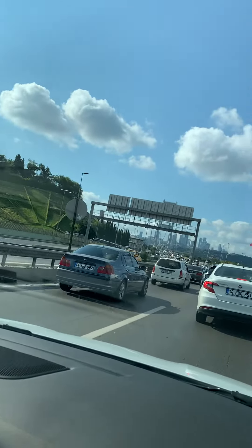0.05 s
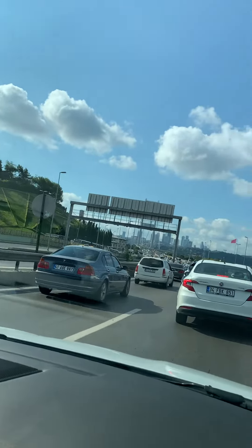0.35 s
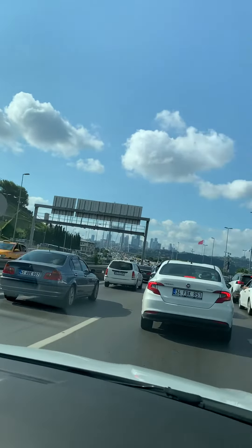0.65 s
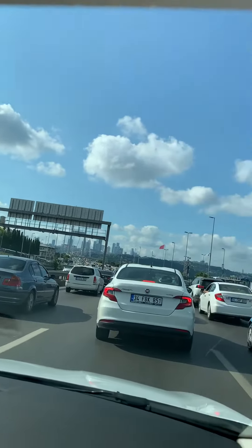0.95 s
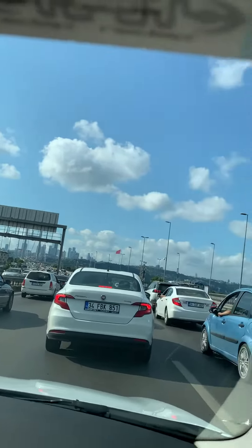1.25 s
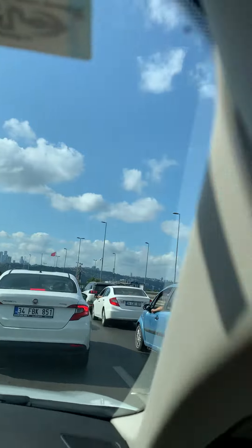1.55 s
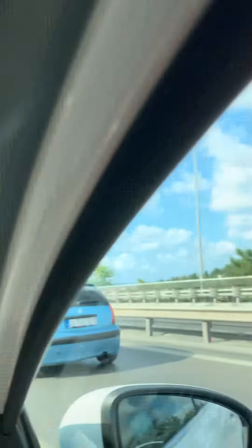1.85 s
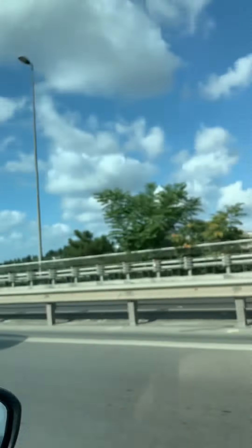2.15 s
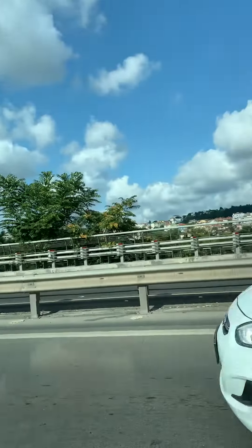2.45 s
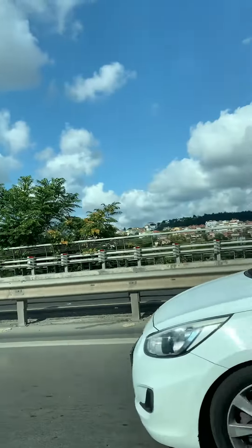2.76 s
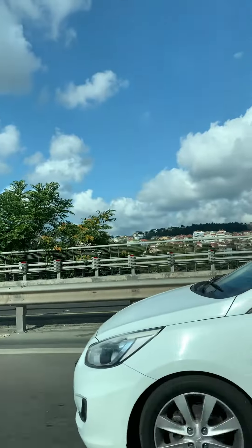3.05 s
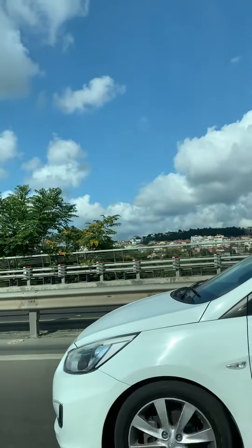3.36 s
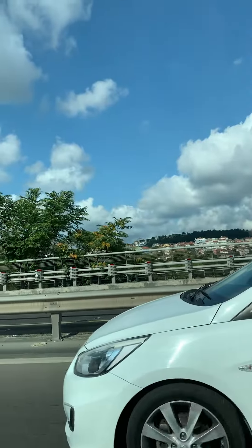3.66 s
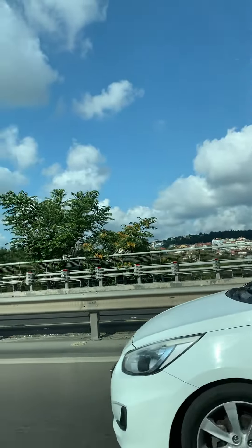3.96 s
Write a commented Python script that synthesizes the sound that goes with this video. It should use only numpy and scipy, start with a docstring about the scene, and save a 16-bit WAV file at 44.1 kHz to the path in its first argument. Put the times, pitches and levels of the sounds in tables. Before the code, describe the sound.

Car engine and road rumble heard from inside, easing to idle in highway traffic.

```python
"""Inside a car rolling in dense highway traffic. At first the engine booms and whines over road rumble,
tyre roar and faint hiss, and soft bumps ring the cabin. The engine sinks to idle and the cabin drones.
Half way, a hand rustles as it turns the phone from the windscreen to the side window, and the trim ticks.
Now the tyres of the next lane come through the glass, swelling and humming, with one more soft bump."""
import sys
import numpy as np
from scipy import signal
from scipy.fft import rfft, irfft
from scipy.io import wavfile
from scipy.ndimage import uniform_filter1d

SR = 44100
rng = np.random.default_rng(int(sys.argv[2]) if len(sys.argv) > 2 else 0)


def generate_wav(sig):
    """Save sig (samples, or channels by samples) to the path in sys.argv[1] as 16-bit PCM at SR."""
    pcm = np.round(np.clip(np.atleast_2d(sig).T, -1, 1) * 32767).astype(np.int16)
    wavfile.write(sys.argv[1], SR, pcm)


N = 176400

# How much louder left is than right, facing ahead and facing the side: pitch_hz, difference_db
AHEAD_BALANCE = [(55, -2), (90, -1.5), (140, -4.5), (210, -6.5), (740, -4.5), (1130, -3), (2600, -0.5)]
SIDE_BALANCE = [(60, 3.5), (140, -4), (330, -10), (740, -6), (1130, -4), (1700, 0)]


def undb(db):
    """Turn decibels into a number to multiply by."""
    return 10 ** (np.asarray(db) / 20)


def clock():
    """The time of every sample, in seconds."""
    return np.arange(N) / SR


def pitches():
    """The pitch of every point in the spectrum, in Hz."""
    return np.maximum(np.arange(N // 2 + 1) * SR / N, 1)


def over_time(rows, column=1):
    """Join the points of a table with straight lines in time."""
    rows = np.array(rows)
    return np.interp(clock(), rows[:, 0], rows[:, column])


def over_pitch(rows):
    """Join the points of a table across pitch, giving each octave equal room."""
    rows = np.array(rows)
    return np.interp(np.log(pitches()), np.log(rows[:, 0]), rows[:, 1])


def peak(pitch_hz, width_hz):
    """The shape of a resonance: 1 at its pitch, less on either side."""
    return 1 / (1 + (2 * (pitches() - pitch_hz) / width_hz) ** 2)


def hump(middle_s, half_width_s):
    """A smooth rise and fall around one moment."""
    return np.exp(-((clock() - middle_s) / half_width_s) ** 2)


def wobble(rate_hz):
    """A smooth random wander, about 1 in size."""
    hold = int(SR / rate_hz)
    steps = rng.standard_normal(256)[np.arange(N) // hold % 256]
    smooth = uniform_filter1d(uniform_filter1d(steps, hold), hold)
    return smooth / np.std(smooth)


def reflections():
    """Echoes in the cabin leave fine peaks and dips in the treble, given in dB."""
    depth_db, spacing_hz, full_above_hz = 1.8, 40, 1500
    ripple = np.interp(pitches(), np.arange(512) * spacing_hz, rng.standard_normal(512))
    return depth_db * np.minimum(pitches() / full_above_hz, 1) * ripple


def noise(tone_db, balance_db=0):
    """Shaped noise of strength 1 at two microphones: partly shared, the right one a little late."""
    # How alike the two sides are (1 is the same): pitch_hz, likeness
    likeness = [(50, .998), (120, 0.93), (220, 1), (380, 0.52), (600, 0.37), (1000, 0.56), (2000, 0.8),
                (4000, 0.51), (7000, 1)]
    # How far the right side lags the left: pitch_hz, lag_radians
    lag = [(60, 0), (430, -.7), (700, .3), (1350, 0), (1800, .6), (2500, 2.3), (3400, 2.5), (5100, 3.2),
           (6500, 6), (7500, 6.4), (9100, 9.2), (10300, 9.6), (11800, 12.4), (13100, 12.7), (14000, 15.5)]
    shared, apart = rfft(rng.standard_normal((2, N)))
    alike = np.clip(over_pitch(likeness), 0, .999)
    shared, apart = shared * np.sqrt(1 + alike), apart * np.sqrt(1 - alike)
    left = (shared + apart) * undb(balance_db / 2)
    right = (shared - apart) * undb(-balance_db / 2) * np.exp(-1j * over_pitch(lag))
    sound = irfft(np.array([left, right]) * undb(tone_db + reflections()), N)
    return sound / np.std(sound)


def through_body(sound):
    """Sound carried by the car's body is stronger on the door side."""
    balance_db = over_pitch(AHEAD_BALANCE)
    return irfft(rfft(sound) * undb(np.array([balance_db, -balance_db]) / 2), N)


def engine():
    """The firing cylinders boom while pulling, then sink to a lumpier idle."""
    # How fast the engine fires and how loud it is: time_s, pitch_hz, level_db
    revs = [(0, 59.25, -31.5), (.15, 57.85, -30), (.3, 56.3, -21), (.48, 54.64, -22.5), (.57, 53.14, -32),
            (.7, 52.61, -30.5), (.8, 50.63, -23.5), (.88, 47.42, -31), (1.05, 43.48, -31),
            (1.4, 33.22, -36), (1.85, 30.26, -36), (2.7, 29.18, -37.5), (4, 27.32, -36)]
    # The tones in its hum: pitch_multiple, pulling_db, idling_db
    tones = [(1, 5, 1), (2, -12, -1), (3, -31, -5), (4, -35, -14)]
    pitch_hz = over_time(revs) * (1 + .0088 * wobble(17))
    phase = 2 * np.pi * np.cumsum(pitch_hz) / SR
    lift_off_s, idle_s, rough_db = .45, 1.09, 2
    idle = over_time([(lift_off_s, 0), (idle_s, 1)])
    hum = np.zeros(N)
    for multiple, pulling_db, idling_db in tones:
        level_db = pulling_db + idle * (idling_db - pulling_db) + rough_db * wobble(22.17)
        hum += undb(level_db) * np.sin(multiple * phase + 2 * np.pi * rng.random())
    return through_body(np.sqrt(2) * hum * undb(over_time(revs, column=2)))


def whine():
    """A narrow, noisy whine dies away while the engine slows."""
    # The whine's fade: time_s, level_db
    loudness = [(0, -56), (.27, -54), (.6, -56.5), (1.3, -61.5), (1.55, -72)]
    band = noise(20 * np.log10(peak(1875, width_hz=150)))
    return band * undb(over_time(loudness) + wobble(19))


def rumble():
    """The rough road shakes the body through the wheels; the cabin drones as the car coasts."""
    # How hard the road shakes the car: time_s, level_db
    loudness = [(0, -27), (.6, -26.5), (1.05, -29), (2.2, -31.5), (3.1, -31), (3.65, -39.5), (4, -31.5)]
    # The rumble's deep tone: pitch_hz, relative_db
    tone = [(15, -53.5), (20, -24), (28, -8.5), (38, 6.5), (46, -0.5), (58, 8.5), (72, 5.5), (92, 2),
            (122, -3), (150, -8.5), (240, -73)]
    balance_db = over_pitch(AHEAD_BALANCE)
    drone = noise(40 * np.log10(peak(102, width_hz=43)), balance_db)
    shake = noise(over_pitch(tone), balance_db) * undb(over_time(loudness))
    return shake + drone * undb(-33) * hump(middle_s=1.2, half_width_s=.66)


def roar(tone, rings, balance, flutter_db):
    """Tyre noise comes through glass and trim, ringing at a few pitches and fluttering slightly."""
    tone_db = over_pitch(tone) + sum(lift_db * peak(hz, width_hz) for hz, width_hz, lift_db in rings)
    return noise(tone_db, over_pitch(balance)) * undb(flutter_db * wobble(16))


def tyres():
    """Turning the phone trades the tyre noise from ahead for that of the next lane."""
    # Road noise at the windscreen and at the side window: pitch_hz, relative_db
    ahead_tone = [(30, -28.5), (55, -15), (75, 16), (95, 4.5), (120, 4.5), (150, -2), (185, 1.5), (230, -4),
                  (320, -8.5), (410, -7.5), (580, -17.5), (850, -20), (1200, -25.5), (1650, -28),
                  (1900, -35.5), (2100, -32), (2800, -35.5), (4000, -47.5), (9000, -79)]
    side_tone = [(30, -23), (70, -5.5), (125, 2), (180, 1.5), (250, -4), (305, -2), (390, -12.5),
                 (520, -14.5), (660, -15.5), (790, -20.5), (1050, -20), (1450, -23), (1780, -24.5),
                 (2050, -33.5), (2400, -37.5), (7000, -84.5)]
    # Where the tyres and cabin ring: pitch_hz, width_hz, lift_db
    ahead_rings = [(1318, 24, 4.5), (1573, 38, 6.5), (2760, 290, 3), (4100, 210, 8.5)]
    side_rings = [(927, 140, 5.9), (1312.6, 19, 7.8), (1693, 43, 7.5), (2740, 69, 4.8), (3900, 220, 11)]
    turn_start_s, turn_end_s = 1.31, 2.3
    turn = np.pi / 2 * over_time([(turn_start_s, 0), (turn_end_s, 1)])
    ahead = undb(-29.5) * roar(ahead_tone, ahead_rings, AHEAD_BALANCE, flutter_db=.93)
    side = undb(-33.5) * roar(side_tone, side_rings, SIDE_BALANCE, flutter_db=.4)
    return np.cos(turn) * ahead + np.sin(turn) * side


def hiss():
    """Air hisses steadily, and a thin sizzle comes and goes above it."""
    # The tone of the air: pitch_hz, relative_db
    tone = [(2500, -4), (3400, 4.5), (4400, 0), (5600, -1.5), (6700, -3), (7800, -10), (12500, -21),
            (14000, -25)]
    # The sizzle's rise and fall: time_s, level_db
    loudness = [(0, -78), (2.35, -85), (2.45, -68.5), (2.8, -69), (3.05, -83), (3.5, -77), (3.95, -71.5)]
    sizzle = noise(40 * np.log10(peak(6720, width_hz=700))) * undb(over_time(loudness))
    return undb(-62.5) * noise(over_pitch(tone)) + sizzle


def bumps():
    """Each bump pushes softly on the body and makes the cabin ring."""
    # Bumps in the road: start_s, level_db
    hits = [(0.138, -22), (0.297, -26.5), (0.784, -24), (1.013, -19), (2.931, -22)]
    # The cabin's own notes, each dying by 60 dB in its ring time: pitch_hz, relative_db, ring_s
    notes = [(52.7, 3, 0.23), (92.5, 5, 0.1), (123, -16, 0.066)]
    rise_s = .0035
    sound = np.zeros(N)
    for start_s, level_db in hits:
        age = np.maximum(clock() - start_s, 0)
        ring = sum(undb(db - 60 * age / ring_s) * np.sin(2 * np.pi * hz * age)
                   for hz, db, ring_s in notes)
        sound += undb(level_db) * ring * (1 - np.exp(-age / rise_s))
    return through_body(sound)


def tread():
    """The tyre treads of nearby cars hum, most of all as a car draws alongside."""
    # The hum's rise and fall: time_s, level_db
    loudness = [(.6, -68), (.85, -57), (1.2, -64.5), (2.2, -63.5), (2.85, -52), (3.4, -50.5), (3.85, -53)]
    flutter_db = 1.8
    band = noise(20 * np.log10(peak(955, width_hz=150)), over_pitch(SIDE_BALANCE))
    return band * undb(over_time(loudness) + flutter_db * wobble(10))


def hand():
    """A hand rubs on the phone, making short swishes and a grainy rustle; two bright ticks share the same tone."""
    # Quick slips of the hand, then two bright ticks late on: middle_s, half_width_s, level_db
    bursts = [(.68, .016, -70), (.748, .026, -64), (2.372, .012, -68), (3.025, .008, -68)]
    # The longer rustle: time_s, level_db
    loudness = [(1.2, -74), (1.58, -66), (1.7, -63), (1.9, -58.5), (2.38, -63.5), (2.47, -74),
                (2.75, -64.5), (2.9, -92), (3.7, -78), (3.9, -73)]
    # The bright tone of both: pitch_hz, relative_db
    tone = [(2000, -1.5), (3800, 7.5), (5200, 0.5), (7200, -3), (9500, -5.5), (12000, -5), (13500, -8)]
    grain_db = 1.2
    short_bursts = sum(undb(db) * hump(middle_s, half_width_s) for middle_s, half_width_s, db in bursts)
    rub = undb(over_time(loudness)) + short_bursts
    return rub * undb(grain_db * wobble(45)) * noise(over_pitch(tone))


def tyre_swells():
    """Tyre roar swells twice through the side glass."""
    # Each swell: middle_s, half_width_s, level_db
    swells = [(1.82, 0.24, -50), (2.6, 0.4, -54)]
    # The tone of the roar: pitch_hz, relative_db
    tone = [(450, -21.5), (800, -3), (1350, -0.5), (1750, 2), (2100, -9), (5000, -61)]
    strength = sum(undb(db) * hump(middle_s, half_width_s) for middle_s, half_width_s, db in swells)
    return strength * noise(over_pitch(tone))


def trim_tick():
    """The trim gives a small tick: a burst of noise that dies at once."""
    # When it ticks: start_s, level_db
    ticks = [(1.904, -42)]
    # The tick's sharp tone: pitch_hz, relative_db
    tone = [(1000, -43), (3600, 13), (4250, 14), (5000, 2), (7000, -3), (13000, -16)]
    rise_s, fade_s = .002, .006
    strength = np.zeros(N)
    for start_s, level_db in ticks:
        age = np.maximum(clock() - start_s, 0)
        strength += undb(level_db) * (1 - np.exp(-age / rise_s)) * np.exp(-age / fade_s)
    return strength * noise(over_pitch(tone))


def scene():
    """Everything heard from the passenger seat."""
    own_car = engine() + whine() + rumble() + bumps()
    traffic = tyres() + tyre_swells() + tread()
    return own_car + traffic + hiss() + trim_tick() + hand()


def record(dry):
    """The phone cuts the deepest bass and the highest treble."""
    lowest_hz, highest_hz = 20, 13800
    thinned = signal.sosfilt(signal.butter(2, lowest_hz, "high", fs=SR, output="sos"), dry)
    return signal.sosfilt(signal.ellip(8, .2, 70, highest_hz, fs=SR, output="sos"), thinned)


dry = scene()
out = record(dry)
generate_wav(out)
```